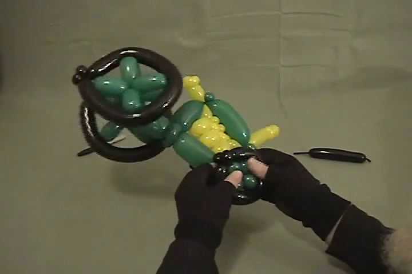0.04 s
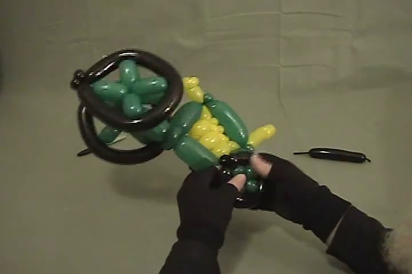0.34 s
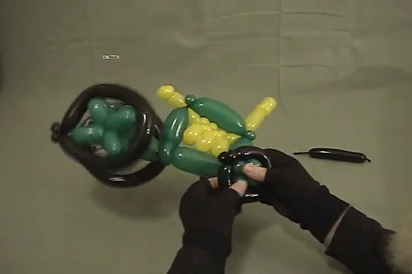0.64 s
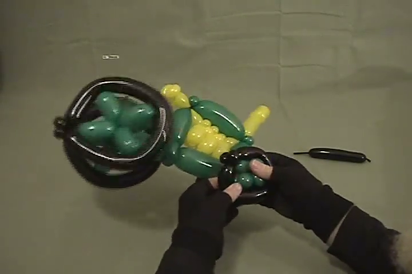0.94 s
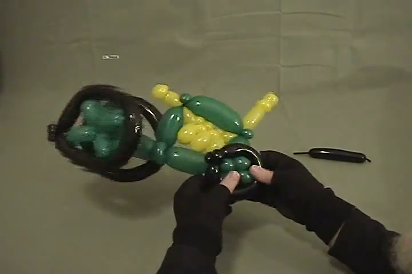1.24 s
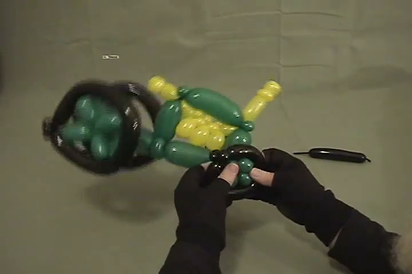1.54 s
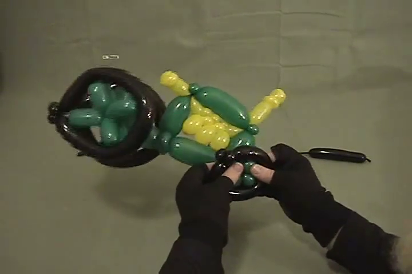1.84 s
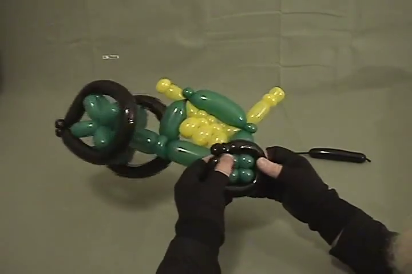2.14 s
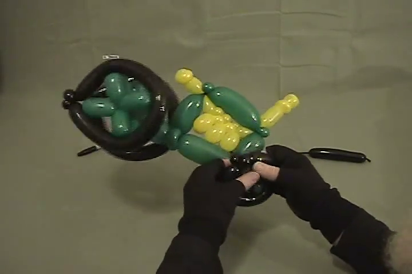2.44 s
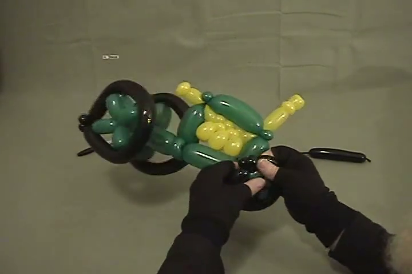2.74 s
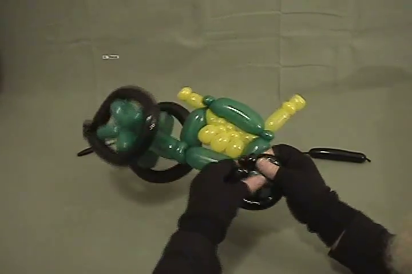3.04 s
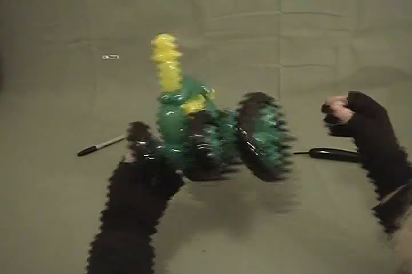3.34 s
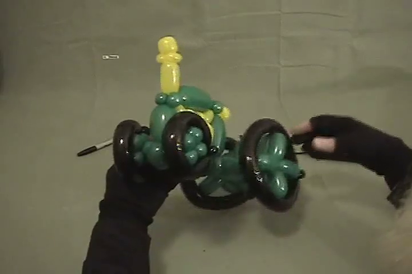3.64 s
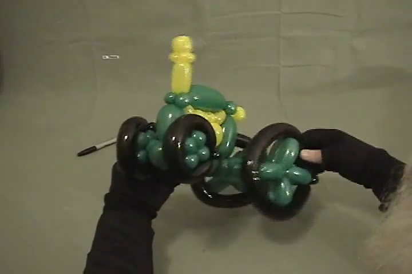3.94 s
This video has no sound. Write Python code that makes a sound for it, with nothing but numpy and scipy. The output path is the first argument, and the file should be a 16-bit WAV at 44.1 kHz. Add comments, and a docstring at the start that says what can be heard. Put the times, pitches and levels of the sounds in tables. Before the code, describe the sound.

Hands twisting long balloons, with close rubbery creaks, crackles and sharp snaps.

```python
"""Hands twist and press a figure of long rubber balloons, close by in a small room. From the start, rubber
sticks and slips on rubber: each slip sends a falling chirp through the tight skin and rings the air
inside. Slips come as snaps, creaks and a steady creep, over soft thuds and rustling gloves.
Just before 1 s comes the strongest snap; loud snaps overload the recorder. Creaks and snaps go on,
then weaken after about 3.3 s, and near the end fingers bump the tubes three times."""
import sys
import numpy as np
from scipy import signal
from scipy.fft import rfft, irfft, next_fast_len
from scipy.io import wavfile
from scipy.ndimage import uniform_filter1d

SR = 44100
rng = np.random.default_rng(int(sys.argv[2]) if len(sys.argv) > 2 else 0)


def materialize(psi):
    """Save the field psi as 16-bit PCM at rate SR to the path in sys.argv[1].

    A 1-D psi becomes a single channel; in a 2-D psi each row is a channel.
    """
    bounded = np.clip(np.atleast_2d(psi).T, -1, 1)
    quanta = np.round(bounded * 32767).astype(np.int16)
    wavfile.write(sys.argv[1], SR, quanta)


N = 176400  # 4 seconds

# Levels are relative. f is frequency; t60 is the time a sound takes to fade by 60 dB.
# single snaps: t/s, level/dB, centre f/Hz, width/octaves, plucked patch's tone f/Hz, tone level/dB
SNAP_EVENTS = [(0.0132, -19.5, 2510.0, 0.71, 1390, 11.5), (0.0484, -26, 10100, 0.38, 2790.0, 5),
               (0.073, -25.0, 1530.0, 1.8, 1400.0, -10), (0.1658, -23.0, 3290.0, 1.6, 990.0, 11),
               (0.1795, -21.5, 2800.0, 0.95, 1060.0, 13), (0.1967, -22.0, 1460.0, 1.8, 4510.0, -1),
               (0.2058, -13.5, 7700, 1.9, 2840.0, -2), (0.2251, -11.5, 5910.0, 0.83, 3250, 10.5),
               (0.2297, -9.5, 3200.0, 1.4, 1300, 9), (0.2896, -19, 2300.0, 1.07, 1050, 9),
               (0.4083, -26, 3500, 0.63, 1040.0, 8), (0.4404, -21.5, 2530.0, 0.67, 893, 7),
               (0.4622, -25, 1590.0, 1.2, 2630, 15), (0.4814, -19.5, 1848, 1.82, 2930.0, 9),
               (0.5102, -11, 3918, 0.88, 2290.0, 1.5), (0.5944, -22.5, 1170.0, 1.7, 3100, 11),
               (0.6341, -26.5, 2784, 0.45, 1008, 10), (0.7197, -22, 4250.0, 0.92, 890.0, 13),
               (0.759, -26, 3210.0, 0.66, 957, 12), (0.7678, -22.5, 3590, 1.13, 990.0, 7),
               (0.8192, -5, 1910.0, 2, 2250, 2.5), (0.871, -9, 2780.0, 1.14, 2640, 5.5),
               (0.9478, -24.5, 2660, 1.5, 892, 21), (1, -14.0, 4070.0, 1.1, 6864, 2),
               (1.0683, -26.0, 1735, 1.7, 2510.0, 10), (1.218, -31.5, 2965, 0.72, 1537, 7),
               (1.26, -33, 3030.0, 0.52, 1138, 18), (1.2885, -25.0, 1380.0, 1.4, 1670.0, -8),
               (1.3976, -23.5, 1020.0, 1.7, 2809, 1), (1.5325, -17, 4915, 0.47, 1929, 13.5),
               (1.5827, -26.5, 3190.0, 0.91, 1389, 5), (1.694, -27, 2920.0, 0.61, 880, 10),
               (1.7416, -25, 1803, 1.44, 1407, 7), (1.7522, -26, 1840.0, 1.7, 1295, 5),
               (1.7769, -20.0, 5230.0, 1.7, 6260, -5), (1.8171, -27, 3550, 0.77, 3510, -7),
               (1.8248, -32, 3130.0, 0.95, 3600.0, 1), (1.832, -9.5, 3070.0, 1.26, 4370, -5),
               (1.8843, -26.5, 4000.0, 0.92, 1478, 17), (1.9198, -20, 6600, 1.37, 2199, 5),
               (1.9332, -20, 2764, 1.25, 9000.0, 6), (1.9748, -22.5, 2340.0, 0.82, 6620.0, 5),
               (2.156, -27.5, 2932, 1.23, 1684, 10), (2.2586, -30, 2120.0, 0.57, 4810.0, 9),
               (2.2928, -26.0, 2137, 0.86, 2865, -7), (2.2992, -24.5, 1181, 1.93, 7320, 8),
               (2.3066, -28.0, 1170.0, 1.9, 2380.0, 9), (2.3277, -22, 1021, 2, 1990.0, 1),
               (2.4349, -17, 2790, 1.78, 3220.0, -2), (2.5007, -18, 2360.0, 1.84, 4670, 3),
               (2.5478, -13, 2589, 1.04, 2908, 3), (2.7025, -22.0, 3063, 0.94, 12520, 2),
               (2.7139, -8, 3370.0, 1.72, 2136, 6), (2.737, -25, 2096, 0.75, 7490, 13),
               (2.7464, -11.5, 5324, 0.66, 1944, -6), (2.8032, -22.5, 4643, 0.61, 940.0, 11),
               (2.918, -19.5, 4874, 0.85, 880, 18.5), (3.0179, -30, 2352, 0.96, 2366, 7),
               (3.0955, -15, 1936, 0.86, 7614, 8.5), (3.1207, -20.5, 4465, 0.91, 3550.0, -9),
               (3.1422, -21, 2483, 1.31, 2195, 0), (3.2709, -18, 1910, 0.95, 968.4, 12),
               (3.305, -28, 3792, 1.27, 992.4, 14), (3.4308, -23.5, 1890.0, 0.98, 3600.0, 3),
               (3.447, -34, 5720, 1.4, 1696, 8), (3.4717, -26.5, 3120.0, 1.16, 1407, 12),
               (3.485, -33, 1468, 1.7, 3020, 15), (3.5088, -23.5, 1510.0, 0.74, 3610.0, 11),
               (3.551, -29.5, 1630, 1.7, 1000, 0), (3.5736, -30, 2550, 2, 1460.0, 2),
               (3.602, -36, 1020.0, 1.7, 1450.0, 17), (3.619, -37, 1010, 1.9, 3610, 18),
               (3.704, -29, 2230.0, 1.1, 1460.0, -2), (3.736, -29.5, 12350, 1.84, 1543, 15),
               (3.7492, -26.5, 6640, 1.45, 900, 15), (3.792, -21.5, 4860.0, 1.45, 12230, 2),
               (3.997, -25, 2360, 0.78, 1194, 7)]
# creaks: start t/s, end t/s, slip rate/(1/s), level/dB, centre f/Hz, roughness (0 smooth, about 1 rough)
CREAK_RUNS = [(0.095, 0.139, 218, -28, 2540, 1.02), (0.201, 0.222, 360, -37, 2800, 1.1),
              (0.328, 0.365, 262, -36.5, 2400, 0.74), (0.418, 0.51, 212, -32.5, 2600, 0.75),
              (0.524, 0.551, 220, -43, 2300, .6), (0.599, 0.687, 140, -30, 2600, 0.7),
              (0.723, 0.743, 360, -31.5, 3050, 0.83), (0.761, 0.814, 150, -35, 2780, 0.83),
              (0.956, 0.997, 170, -33, 3020, 0.86), (1.077, 1.103, 157, -26.5, 2900, 0.77),
              (1.101, 1.128, 210, -25, 2490, 0.24), (1.135, 1.195, 190, -55, 1703, 0.52),
              (1.273, 1.305, 197, -32.5, 2200, 0.67), (1.339, 1.394, 215, -38.5, 2200, 0.87),
              (1.399, 1.433, 204, -31, 1900, 0.72), (1.434, 1.534, 180, -29, 2158, 0.77),
              (1.598, 1.711, 117, -34, 2197, 0.8), (1.896, 1.951, 265, -31, 2300, 0.5),
              (1.973, 1.991, 405, -27.5, 2202, 0.75), (2.004, 2.028, 393, -25.5, 1877, 0.75),
              (2.132, 2.171, 242, -36.5, 2260, 0.62), (2.195, 2.227, 263, -35, 2134, 0.77),
              (2.341, 2.402, 214, -35, 2000, .7), (2.441, 2.502, 200, -38, 2110, 1),
              (2.599, 2.699, 250, -32, 2184, 0.97), (2.715, 2.742, 268, -34, 2490, 0.79),
              (2.78, 2.898, 267, -33, 2870, 0.81), (2.897, 2.931, 400, -28, 2871, 0.8),
              (3.019, 3.086, 249, -32.5, 2005, 0.66), (3.1, 3.137, 243, -38, 2600, .7),
              (3.15, 3.224, 256, -26.5, 1930, .14), (3.226, 3.263, 270, -41, 1804, 0.33),
              (3.27, 3.291, 313, -28, 1592, 0.61), (3.382, 3.412, 263, -32, 2377, 0.8),
              (3.66, 3.735, 170, -40.5, 2203, 0.62), (3.771, 3.826, 108, -44, 2607, 0.5),
              (3.85, 3.911, 91, -44, 1900, 0.45)]
# how strongly the squeezed joints creep: t/s, level/dB
SQUEEZE = [(0, -33), (.3, -32), (.39, -36), (.45, -35), (.9, -31), (.935, -35), (1, -33.5), (1.1, -31.5),
           (1.15, -33.5), (1.24, -43), (1.45, -31), (1.7, -41), (2.03, -34), (2.09, -42), (2.16, -33),
           (2.26, -39), (2.35, -30.5), (2.92, -37.5), (2.97, -43.5), (3.0, -42), (3.1, -30), (3.28, -34),
           (3.35, -40), (3.6, -39.5), (3.88, -40.5), (3.92, -56), (4, -43)]
# tone colour of every slip: f/Hz, level/dB
SKIN_COLOUR = [(40, -30), (130, -18), (280, -17.5), (450, -8.5), (700, -2), (1100, -0.5), (1600, 5),
               (2500, 0.5), (4500, -2), (7000, 0), (10000, -5), (14000, -4), (16000, -9)]
# notes of the air in the tubes: f/Hz, level/dB, t60/s
AIR_NOTES = [(380, -22, 0.05), (421, 1, 0.055), (524, 1, 0.043), (662.4, -2, 0.24), (729, -2.5, 0.063),
             (859, -7, 0.031), (1155, -4.5, 0.028), (1534, -6, 0.021), (1995, -9.5, 0.07),
             (2420, -24, 0.06), (2995, -9.5, 0.055)]
# finger bumps: t/s, level/dB, skin f/Hz, air level over skin/dB, air f/Hz, t60/s
FINGER_BUMPS = [(3.637, -20, 1535, -2.5, 530, 0.021), (3.832, -28.5, 1926, 2.5, 648, 0.06),
                (3.941, -31, 1912, -3.5, 615, 0.078)]
# hollow sounds of a tube (gloves dragging over it, and at 0.82 s the low body of the strongest snap):
# start t/s, end t/s, level/dB, hollow note f/Hz
HOLLOW_SOUNDS = [(0.29, 0.317, -49, 650), (0.44, 0.518, -41.5, 740), (0.587, 0.647, -40, 640),
                 (0.728, 0.767, -43, 662), (0.819, 0.838, -28.5, 762), (1.34, 1.642, -48, 664.2),
                 (1.949, 2.039, -42.5, 560.5), (2.163, 2.27, -46, 528.6), (2.292, 2.45, -44.5, 560),
                 (2.47, 2.588, -43.5, 467.5), (2.597, 2.699, -40, 715), (2.788, 2.957, -46.5, 860),
                 (3.128, 3.302, -45, 520), (3.555, 3.58, -47, 454), (3.639, 3.662, -43.5, 450),
                 (3.835, 3.858, -44.5, 420)]
# tone colour of the hollow sounds: f/Hz, level/dB
HOLLOW_COLOUR = [(100, -27), (280, -17.5), (400, 0), (650, -0.5), (900, -1.5), (1400, -4), (4000, -46)]
# jolts of the whole figure: t/s, level/dB, f/Hz
FIGURE_JOLTS = [(.19, -50, 140), (0.226, -49, 110), (0.341, -50, 170), (0.482, -52, 169), (0.601, -50, 170),
                (0.821, -52, 130.1), (0.872, -61, 120), (1.11, -49, 169.8), (1.833, -63, 109.9),
                (1.991, -51, 190.3), (2.211, -56, 160.1), (2.711, -47, 105.3), (3.19, -45, 189.5),
                (3.39, -50, 179.7), (3.56, -47, 190.6), (3.638, -51, 200.2), (3.834, -39, 190)]
# tone colour of the rustle: f/Hz, level/dB
RUSTLE_COLOUR = [(25, -45), (70, -9), (140, 1), (200, 2.5), (280, -2.5), (500, 5), (1000, -12), (4000, -25),
                 (15000, -45)]
# how long the room echoes: f/Hz, t60/s
ECHO_DECAY = [(200, 0.23), (530, 0.16), (1400, 0.095), (3700, 0.15), (10000, 0.08)]
# tone colour of the echo: f/Hz, level/dB
ECHO_COLOUR = [(100, 0.5), (600, -0.5), (2000, -2.5), (6000, -4), (15000, -3)]
# stereo width of sound from all around: f/Hz, side level over middle/dB
STEREO_WIDTH = [(40, -1), (80, -12), (140, -11), (280, -11), (600, -10), (2000, -5), (8000, -8)]
# how much louder the left microphone is than the right: f/Hz, level/dB
LEFT_GAIN = [(100, 3), (500, 0.5), (1100, 0), (2200, -1), (4000, -5), (8000, 2.2), (14000, 0)]
# how far the left microphone is ahead of the right: f/Hz, phase/radians
LEFT_LEAD = [(40, -0.5), (80, -1.3), (140, -0.36), (250, -0.2), (500, -0.093), (1000, 0.13), (1700, 0.4),
             (2600, -0.38), (4000, 0.23), (6000, 0.68), (10000, -0.15)]


def slips(rows):
    """Each slip is a falling chirp (short waves cross the skin first), a tone and a brief rattle."""
    size, lead = 1024, 24  # samples
    energy, skirt_db, tone_q = 115, -3.5, 8.4
    rattle_db, rattle_t60_s = -2, 0.014
    times, db, centre_hz, width, tone_hz, tone_db = np.transpose(rows)[:, :, None]
    hz, t = np.fft.rfftfreq(size, 1 / SR), np.arange(size) / SR
    chance = rng.standard_normal((len(times), size + 1))
    octaves = np.log2((hz + 1) / centre_hz)
    hump = np.exp(-.5 * (octaves / width) ** 2)
    skirt = amp(skirt_db) * width / np.sqrt(1 + (octaves / 2) ** 2)  # reaches far above and below
    tone = 1 + amp(tone_db) * resonance(hz, tone_hz, tone_q)
    spectrum = (hump + skirt) * tone * amp(along(SKIN_COLOUR, hz))
    lag_1500_s = 0.000977 * np.exp(0.2967 * chance[:, -1:])  # how late the 1500 Hz wave arrives
    lag_s = lag_1500_s * (1500 / np.maximum(hz, 500)) ** 0.856  # lower waves come later
    phase = 2 * np.pi * np.cumsum(lag_s * SR + lead, axis=1) / size
    rattle = normed(chance[:, :size] * fade(t, rattle_t60_s))  # waves running round the tube
    waves = irfft(spectrum * np.exp(-1j * phase) * (1 + amp(rattle_db) * rfft(rattle)))
    return placed(times[:, 0] - lead / SR, normed(waves) * np.sqrt(energy) * amp(db))


def creaks():
    """Pushed rubber lets go again and again: evenly with a high rasp if smooth, unevenly if rough."""
    smooth_octaves, rough_octaves, sag_octaves, scatter_db = .2, 1.36, 0.2, 4.5
    rows = []
    for start, end, rate, db, centre_hz, rough in CREAK_RUNS:
        timing, strength, pitch = rough * rng.standard_normal((3, 64))
        gaps = np.exp(.35 * timing) / rate
        times = start + np.cumsum(gaps) - gaps[0]
        progress = (times - start) / (end - start)
        sag = 2 ** (sag_octaves * (.5 - progress))  # the pitch sinks as the tension eases
        hz = centre_hz * sag * np.exp(0.47 * pitch)
        width = smooth_octaves + rough ** 2 * (rough_octaves - smooth_octaves)
        rasp_hz = 5630 * sag * np.exp(0.2 * rng.standard_normal(len(times)))
        rasp_db = 13.5 - 25.5 * rough
        run = as_rows(times, db + scatter_db * strength, hz, width, rasp_hz, rasp_db)
        rows.append(run[times < end])
    return slips(np.vstack(rows))


def creep():
    """Tiny slips where the tubes press together; a harder squeeze makes them louder and lower."""
    slips_per_s, scatter_db, width_octaves, tone_db, octaves_per_db = 420, 3.5, 0.63, -2, -0.03
    count = int(slips_per_s * N / SR)
    timing, strength, pitch = rng.standard_normal((count, 3)).T
    times = (np.arange(count) + timing / 2) / slips_per_s
    squeeze_db = np.interp(times, *np.transpose(SQUEEZE))
    bend = 2 ** (octaves_per_db * (squeeze_db - squeeze_db.mean()))
    hz = 1864 * np.exp(0.71 * pitch) * bend
    db = squeeze_db - 5 + scatter_db * strength
    return slips(as_rows(times, db, hz, width_octaves, hz, tone_db))


def tube_air(skin):
    """The skin rings the air inside; each new grip shifts the pitch and strength of its notes a little."""
    grip_count, scatter_db, detune, air_db = 14, 2, .018, -26.5
    grips = np.zeros((grip_count, SR // 4))
    for grip in grips:
        for hz, db, t60 in AIR_NOTES:
            gain = amp(db + scatter_db * rng.standard_normal())
            note_hz = hz * np.exp(detune * rng.standard_normal())
            grip += gain * normed(ring(note_hz, t60))
    return amp(air_db) * changing(skin, grips)[0]


def finger_bumps():
    """Fingers knock a tube: a dull slap, then a skin tone and a hollow air tone, both fluttering."""
    attack_s, flutter_hz = 0.00053, 60
    slap_octaves, slap_tone_hz, slap_tone_db = 1, 1000, 3
    t = np.arange(SR // 4) / SR
    tones, slaps = [], []
    for start, db, skin_hz, air_db, air_hz, t60 in FINGER_BUMPS:
        flutter = unit(uniform_filter1d(rng.standard_normal((2, len(t))), size=120))
        hz = np.array([[skin_hz], [air_hz]]) + flutter_hz * flutter
        skin, air = np.sin(2 * np.pi * np.cumsum(hz, axis=1) / SR)
        loudness = amp(db) * (1 - np.exp(-t / attack_s)) * fade(t, t60)
        tones.append(loudness * (skin + amp(air_db) * air))
        slaps.append((start, db - 2, skin_hz, slap_octaves, slap_tone_hz, slap_tone_db))
    return slips(slaps) + placed(np.array(FINGER_BUMPS)[:, 0], np.array(tones))


def hollow_sounds():
    """Soft grains sound a hollow tube: gloves catching on it, and the low body of the strongest snap."""
    grains_per_s, edge_s, hollow_db = 1300, 0.029, 6
    t, out = np.arange(N) / SR, np.zeros(N)
    for start, end, db, hollow_hz in HOLLOW_SOUNDS:
        grains = rng.standard_normal(N) * (rng.random(N) < grains_per_s / SR)
        hollow = lambda hz: 1 + amp(hollow_db) * resonance(hz, hollow_hz, q=14)
        body = filtered(grains, lambda hz: amp(along(HOLLOW_COLOUR, hz)) * hollow(hz))
        swell = np.clip(np.minimum(t - start, end - t) / edge_s + .5, 0, 1)
        out += amp(db) * swell * unit(body)
    return out


def jolts():
    """A twist gives way or a hand shifts: the whole figure thuds softly for a few swings."""
    boost_db, swings, attack_s = 12, 5.8, 0.0014
    low_hz = 45  # the thuds are cut away below this
    t = np.arange(SR // 4) / SR
    rise = 1 - np.exp(-t / attack_s)
    thuds = [amp(db + boost_db) * ring(hz, swings / hz) * rise for _, db, hz in FIGURE_JOLTS]
    track = placed(np.array(FIGURE_JOLTS)[:, 0], np.array(thuds))
    return filtered(track, lambda hz: (1j * hz / (low_hz + 1j * hz)) ** 2)


def rustle():
    """Gloves and sleeves make a dull rustle that rises slightly with the squeeze."""
    rustle_db, follow = -53, 0.063
    squeeze_db = np.interp(np.arange(N) / SR, *np.transpose(SQUEEZE))
    noise = filtered(rng.standard_normal((2, N)), lambda hz: amp(along(RUSTLE_COLOUR, hz)))
    return unit(diffuse(noise)) * amp(rustle_db + follow * (squeeze_db - squeeze_db.mean()))


def room_echo(x):
    """The short echo of a small room, which changes as the figure is turned."""
    positions, echo_db, delay_s = 16, -3.5, .002
    noise = rng.standard_normal((positions, 2, SR // 3))
    hz, t, bands = signal.stft(noise, SR, nperseg=256)
    dying_bands = bands * fade(t, along(ECHO_DECAY, hz)[:, None])
    tails = normed(signal.istft(dying_bands, SR, nperseg=256)[1])
    colour = lambda hz: amp(echo_db + along(ECHO_COLOUR, hz))
    echo = filtered(changing(x, tails), lambda hz: colour(hz) * np.exp(-2j * np.pi * hz * delay_s))
    return diffuse(echo)


def amp(db):
    """Decibels as a plain multiplier."""
    return 10 ** (np.asarray(db) / 20)


def unit(x):
    """x scaled to an average power of 1."""
    return x / np.sqrt(np.mean(x ** 2) + 1e-20)


def normed(x):
    """Each row scaled to an energy of 1."""
    return x / (np.linalg.norm(x, axis=-1, keepdims=True) + 1e-20)


def along(points, hz):
    """Read a (frequency, value) table at hz, with octaves evenly spaced."""
    f, values = np.transpose(points)
    return np.interp(np.log(hz + 1), np.log(f + 1), values)


def as_rows(*columns):
    """One row per slip; a single number is repeated in every row."""
    return np.column_stack(np.broadcast_arrays(*columns))


def filtered(x, response):
    """x with each frequency multiplied by response(hz)."""
    size = next_fast_len(N + SR // 2)
    return irfft(rfft(x, size) * response(np.fft.rfftfreq(size, 1 / SR)), size)[..., :N]


def placed(times, waves):
    """Short waves added up at their start times."""
    starts = np.round(np.maximum(times, 0) * SR).astype(int)
    samples = starts[:, None] + np.arange(waves.shape[1])
    return np.bincount(samples.ravel(), waves.ravel(), N)[:N]


def fade(t, t60):
    """A curve that drops 60 dB every t60 seconds."""
    return np.exp(-np.log(1000) * t / t60)


def ring(hz, t60):
    """A pure tone dying away."""
    t = np.arange(SR // 4) / SR
    return np.sin(2 * np.pi * hz * t) * fade(t, t60)


def resonance(hz, centre, q):
    """A peak with gain 1 at its centre; a higher q makes it narrower."""
    return 1j * hz * centre / q / (centre ** 2 - hz ** 2 + 1j * hz * centre / q)


def changing(x, responses):
    """x through a series of rings or echoes, each fading into the next."""
    place = np.arange(N) / N * (len(responses) - 1)
    out = 0
    for k, response in enumerate(responses):
        share = np.maximum(0, 1 - abs(place - k)) ** .5
        out += signal.oaconvolve((x * share)[None], np.atleast_2d(response), axes=1)[:, :N]
    return out


def diffuse(pair):
    """Two unrelated signals mixed to left and right, like sound from all around."""
    mid = filtered(pair[0], np.ones_like)
    side = filtered(pair[1], lambda hz: amp(along(STEREO_WIDTH, hz)))
    return np.array([mid + side, mid - side])


def scene():
    """Balloons, hands and room; the thuds and rustle get no echo."""
    skin = slips(SNAP_EVENTS) + creaks() + creep()
    figure = skin + tube_air(skin) + hollow_sounds() + finger_bumps()
    return figure + room_echo(figure) + jolts() + rustle()


def record(dry):
    """Two close microphones; the loudest snaps overload, then the highest treble is cut."""
    ceiling, top_hz = 0.9, 16200
    half = np.array([[.5], [-.5]])  # left gets half of the gain and lead, right the opposite
    gain = lambda hz: amp(half * along(LEFT_GAIN, hz))
    mics = filtered(dry, lambda hz: gain(hz) * np.exp(1j * half * along(LEFT_LEAD, hz)))
    squashed = mics / (1 + (mics / ceiling) ** 4) ** (1 / 4)
    return filtered(squashed, lambda hz: hz < top_hz)


dry = scene()
out = record(dry)
materialize(out)
```